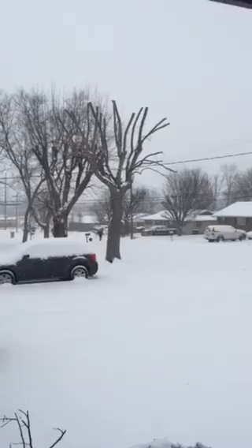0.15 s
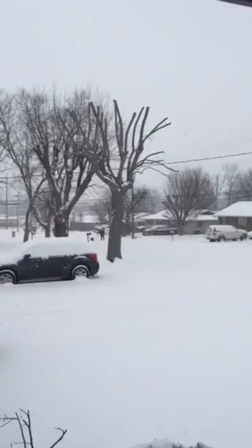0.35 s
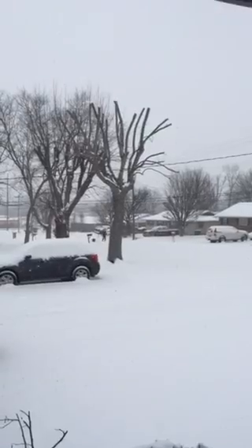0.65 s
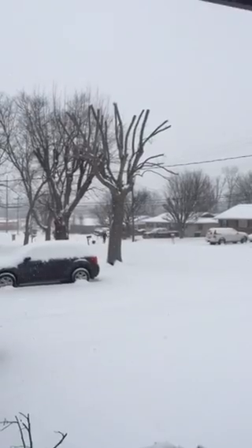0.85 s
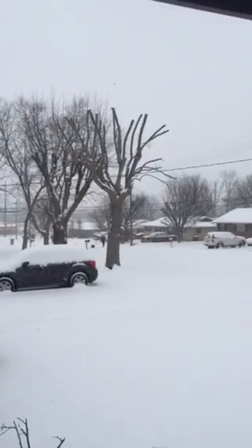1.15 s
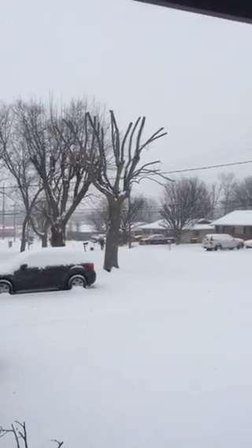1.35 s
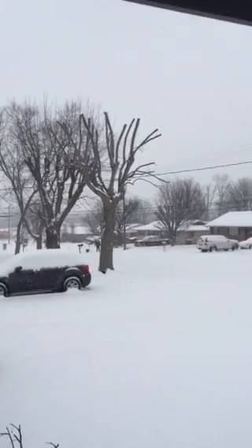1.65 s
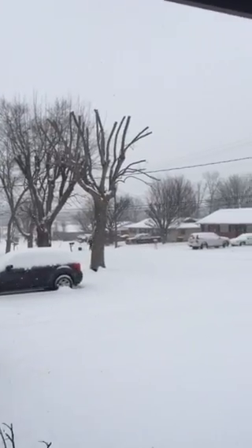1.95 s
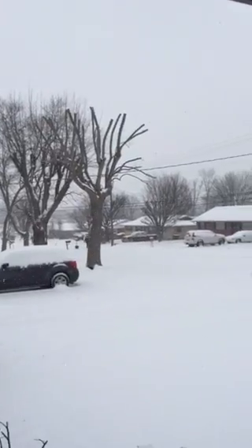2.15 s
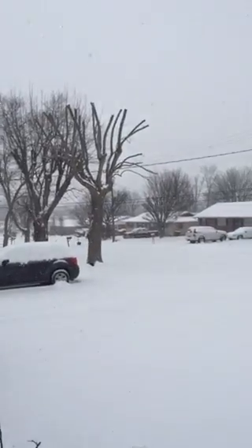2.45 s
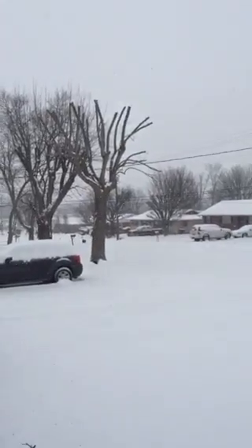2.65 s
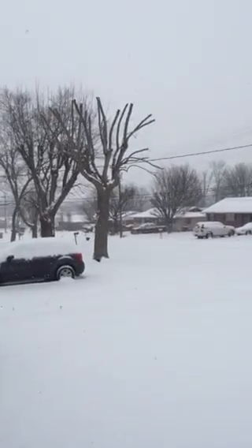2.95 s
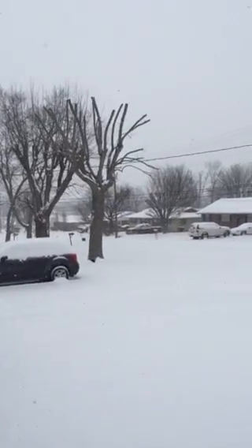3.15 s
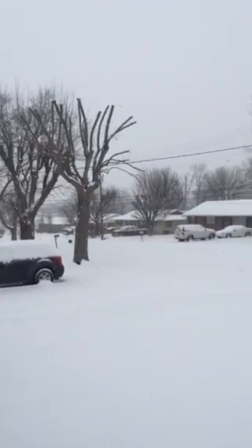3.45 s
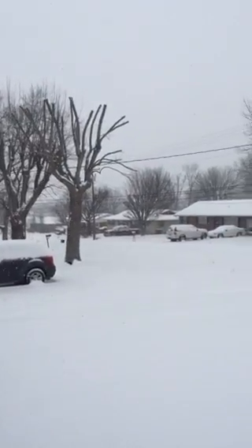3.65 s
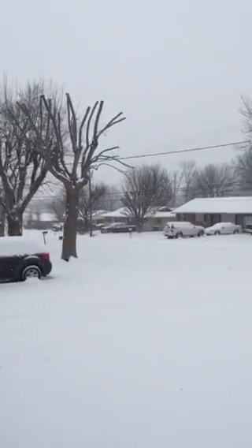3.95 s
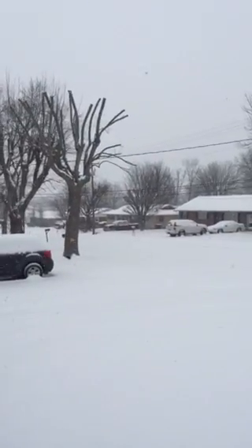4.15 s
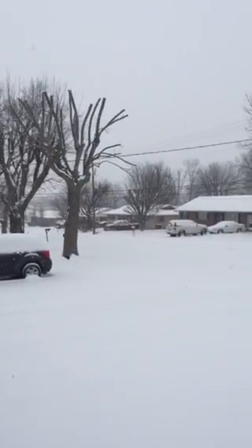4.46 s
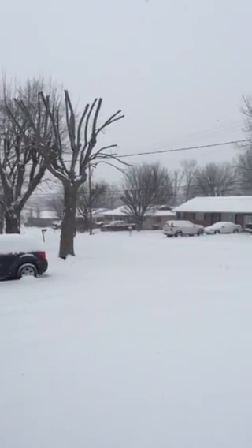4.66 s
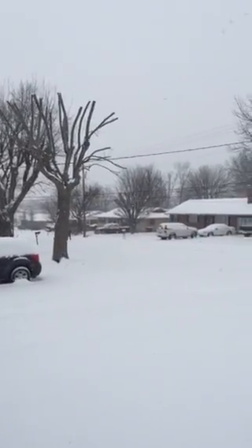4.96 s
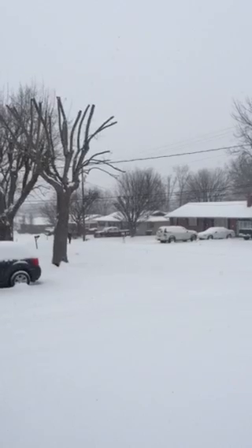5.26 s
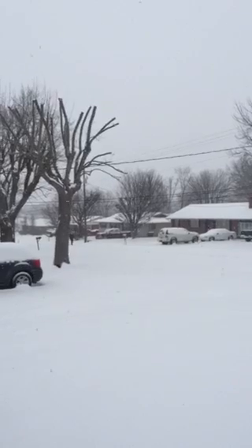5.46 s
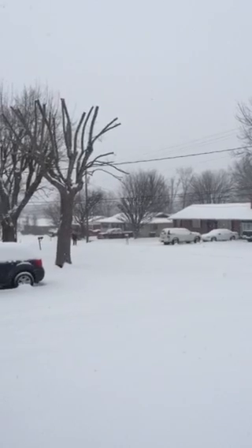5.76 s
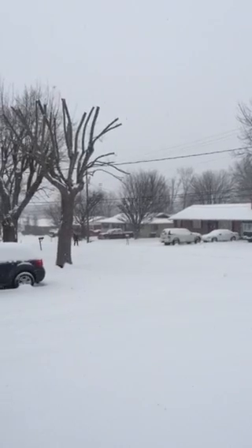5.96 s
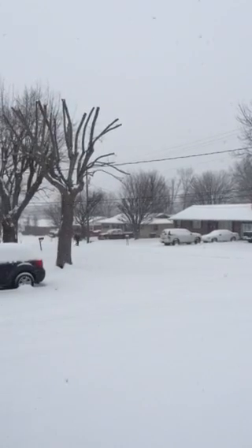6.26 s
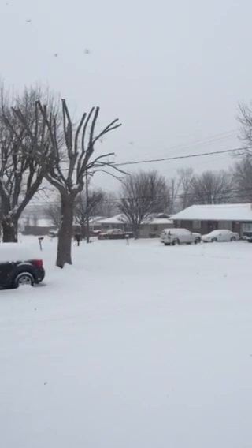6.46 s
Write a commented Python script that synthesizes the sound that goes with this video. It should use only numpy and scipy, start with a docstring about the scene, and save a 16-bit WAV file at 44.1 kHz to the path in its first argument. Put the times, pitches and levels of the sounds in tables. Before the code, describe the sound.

Close to the microphone on a snowy porch, a light outer door swings shut. Its spring gives single hollow knocks, quickening and softening, then the closer rubs with a dry hiss. The door bangs in a tight cluster of wood knocks and metallic latch clacks, with a low panel boom and fading rattle. A brief seal scrape, thin squeak and faint taps follow over a hushed street.

```python
"""A snowy porch: a light outer house door swings shut beside a phone.
Its spring knocks on the jamb faster and faster, its closer rubs; coloured noise and decaying modes make both.
The door strikes the frame, the latch clacks home, and the panel booms and rattles in struck modes and noise.
The seal gives one short scrape of slips and friction, then a thin squeak; soft hollow taps follow.
Behind lie a hushed street with a far engine droning, a muffled road, a hiss and a brief wavering hum."""
import sys
import numpy as np
from scipy import signal
from scipy.fft import rfft, irfft, next_fast_len
from scipy.io import wavfile
from scipy.ndimage import map_coordinates

SR = 44100
rng = np.random.default_rng(int(sys.argv[2]) if len(sys.argv) > 2 else 0)


def generate_wav(signal):
    """Clip the signal to [-1, 1] and save it as 16-bit WAV at the path in sys.argv[1]."""
    frames = np.transpose(np.atleast_2d(signal))
    scaled = np.clip(frames, -1, 1) * 32767
    pcm = np.round(scaled).astype(np.int16)
    wavfile.write(sys.argv[1], SR, pcm)


N = 291490

# Levels in spectra, modes and events are relative; each source sets its own gain.
# door, latch and frame meeting: (time [s], clack level [dB], wood knock level [dB], metal crack level [dB],
# t60 [s], treble limit [Hz])
BLOWS = [(3.927, -29, -20, -38, .07, 30000), (4.102, -33, -32.5, -30.5, 0.16, 11050),
         (4.179, -26.5, -36, -23.5, 0.054, 18000), (4.185, -21, -39.5, -26, 0.046, 9460),
         (4.212, -30.5, -39, -32, 0.15, 12490), (4.273, -33.5, -27.5, -31.5, .075, 9000),
         (4.331, -45.5, -49, -42, 0.108, 8630), (4.360, -48, -49, -49, .09, 9000),
         (4.469, -42.5, -45, -51, .11, 7500), (4.670, -58.5, -66, -71, 0.07, 6000)]
# clack spectrum: (frequency [Hz], level [dB])
CLACK_SPECTRUM = [(300, -19), (600, -13), (800, -9), (1100, -2.5), (1380, -1), (1600, -0.5), (2100, 3.5),
                  (2700, -4), (3400, -5.5), (5000, -18.5), (9000, -26.5)]
# wood knock spectrum: (frequency [Hz], level [dB])
KNOCK_SPECTRUM = [(70, -20), (140, 3), (225, -2.5), (340, -0.5), (430, -7), (530, -5), (610, -4),
                  (780, -10), (1000, -5.5), (2000, -26)]
# latch metal crack spectrum: (frequency [Hz], level [dB])
CRACK_SPECTRUM = [(430, -17), (560, 9), (660, 9.5), (780, -14), (1300, -14), (2500, 0), (3300, 0.5),
                  (4100, 2), (5000, -4.5), (5900, 2), (7500, -2.5), (10000, -7.5), (14000, -9.5),
                  (16000, -21.5)]
# hollow modes of the door frame: (frequency [Hz], level [dB], t60 [s])
WOOD_MODES = [(145, -6.5, 0.063), (228.6, -1, .1), (334.3, -8, 0.034), (540, -11.5, .06)]
# ringing of the door's pane and frame: (frequency [Hz], level [dB], t60 [s])
PANE_MODES = [(236.5, -6, .7), (307, -17, 0.93), (601, -7, 0.38), (669, -18.5, 0.52), (850, -16, 0.253),
              (1173, -8, 0.22), (1356, -1, 0.076), (1633, -6, 0.2), (1700, -4, 0.12), (1810, -11.5, 0.17),
              (1897, -11, .25), (2083, -6, .22), (2376, -15, 0.067), (3350, -15, .1), (4240, -26, 0.11),
              (5600, -17.5, 0.085)]
# whole panel flexing against its stop: (time [s], level [dB])
THUDS = [(3.925, -33), (4.187, -33), (4.213, -27), (4.263, -24), (4.294, -27.5)]
# lowest panel modes: (frequency [Hz], level [dB], t60 [s])
PANEL_MODES = [(53.6, -7, 0.53), (80.9, -2, 0.21), (103.3, -9.5, 0.3), (147, -7.5, 0.16)]
# air shoved by the panel: (frequency [Hz], level [dB])
BOOM_SPECTRUM = [(35, -21.5), (50, -1), (85, -2.5), (115, 1), (150, -1.5), (200, -7.5), (400, -22)]
# slips of the door spring: (time [s], knock level [dB], twang level [dB])
SPRING_SLIPS = [(0.234, -39.5, -66), (0.718, -40, -59), (1.141, -38.5, -49), (1.468, -39, -48),
                (1.766, -40.5, -51.5), (2.037, -47, -55), (2.298, -44.5, -63), (2.538, -47, -61),
                (2.731, -47.5, -59.5), (2.939, -48, -55.5), (3.147, -53.5, -57), (3.332, -51, -65.5)]
# jamb knock spectrum: (frequency [Hz], level [dB])
JAMB_SPECTRUM = [(90, -15), (140, 13), (205, -23), (290, 1), (380, -6.5), (470, -1), (630, 0), (740, -7.5),
                 (860, -1), (1000, -8.5), (1250, -12.5), (1620, -7.5), (2250, -31), (2750, -23),
                 (5000, -74)]
# jamb modes: (frequency [Hz], level [dB], t60 [s])
JAMB_MODES = [(125.3, 0, 0.45), (305.9, -26, 1), (452, -22, 0.2), (647.3, -0.5, 0.16), (810, -14, 0.08),
              (980, -10.5, 0.15), (1447, -3, 0.081), (1645, -5, 0.052)]
# spring coil spectrum: (frequency [Hz], level [dB])
COIL_SPECTRUM = [(330, -22), (480, -7), (580, 10), (700, 1.5), (850, -1.5), (1050, -3.5), (1400, -22.5),
                 (1800, -47)]
# bright snap of a spring slip: (frequency [Hz], level [dB])
SNAP_SPECTRUM = [(1000, 7.5), (1700, 3), (2300, 3.5), (2900, 3.5), (4200, -9.0), (6200, -7), (9000, -28)]
# slides of the closer's rod: (start [s], length [s], groan level [dB], hiss level [dB])
SLIDES = [(2.486, 0.18, -63.5, -70.5), (2.712, 0.024, -63, -69), (3.085, 0.04, -67, -74.5),
          (3.322, 0.031, -69, -67), (3.423, 0.053, -55, -64.5), (3.5, .04, -66.5, -83),
          (3.539, 0.079, -61, -64.5), (3.622, 0.061, -59.5, -59.5), (3.718, 0.074, -69.5, -74)]
# hollow rub of the rod: (frequency [Hz], level [dB])
ROD_SPECTRUM = [(700, -5), (900, -5.5), (1010, 0), (1150, -9), (1350, 2), (1520, -8), (1670, 1.5),
                (1860, -1.5), (2050, -3.5), (2450, -11), (3500, -18)]
# dry hiss of the rod: (frequency [Hz], level [dB])
ROD_HISS_SPECTRUM = [(1800, -8), (2900, 1), (4100, -2), (4900, -7), (5800, -5), (7500, -14.5), (10000, -24),
                     (14000, -34)]
# weatherstrip brushing the frame: (start [s], length [s], rub level [dB], wood level [dB])
BRUSHES = [(3.898, .027, -47, -51.5), (4.557, 0.051, -52, -69)]
# weatherstrip rub spectrum: (frequency [Hz], level [dB])
STRIP_SPECTRUM = [(300, -19.5), (650, -14.5), (950, 5), (1400, -4), (2100, 5.5), (3000, -1.5), (4200, -5),
                  (6000, -14), (9000, -20), (15000, -46)]
# seal scrape spectrum: (frequency [Hz], level [dB])
SEAL_SPECTRUM = [(600, -13), (780, -20), (840, 3.5), (1400, -3), (2100, -3.5), (2350, -5), (4100, -5.5),
                 (6500, -10.5), (9000, -23.5), (15000, -41.5)]
# frame resonances under the scrape: (frequency [Hz], width [Hz], level [dB])
SEAL_PEAKS = [(1066, 35, -8), (1376, 44, 2.5), (1647, 29, 6.5), (2020, 61, 2)]
# seal coming to rest: (frequency [Hz], level [dB])
CREEP_SPECTRUM = [(800, -6.5), (1600, -1), (2600, -1.5), (6500, -4), (9000, -15), (15000, -31.5)]
# soft faint taps: (time [s], frequency [Hz], level [dB])
TAPS = [(5.03, 190, -64), (5.29, 460, -60), (5.345, 504, -59), (5.42, 525, -60.5), (5.48, 508, -60)]
# noise of a tap: (frequency [Hz], level [dB])
SCUFF_SPECTRUM = [(400, -2), (900, -7), (1400, -9.5), (2200, -21)]
# far engine: (frequency [Hz], level [dB])
EXHAUST_SPECTRUM = [(25, -34), (45, -22.5), (62, -4.5), (71, -3.5), (80, -5.5), (95, -21), (112, -11.5),
                    (135, -22.5), (220, -29)]
# far road: (frequency [Hz], level [dB])
ROAD_SPECTRUM = [(30, -2), (110, 3.5), (200, -4.5), (330, -5), (450, -8.5), (700, -13.5), (1200, -17),
                 (3000, -29)]
# steady hiss: (frequency [Hz], level [dB])
HISS_SPECTRUM = [(290, -33), (500, -12), (639, -2), (687, -0.5), (718, -21.5), (1260, -17.5), (1390, -13),
                 (1810, -14), (2000, -9.5), (2210, -11), (2710, -12), (4430, -14), (4900, -14.5),
                 (11800, -20.5), (15800, -21.5)]
# decay of the porch's answer: (frequency [Hz], t60 [s])
PORCH_DECAY = [(100, 0.99), (500, 0.4), (2000, 0.4), (6000, 0.29), (14000, 0.19)]

START_S, TOP_HZ = 0.066, 16000
# first rebound, each flight over the last, loss a rebound, extra loss of the wood knock
BOUNCE_S, BOUNCE_SHRINK, BOUNCE_LOSS_DB, WOOD_LOSS_DB = 0.024, 0.6, 10.5, 4
RISE_S = 0.0014  # time constant of a contact's build-up
SHUDDER_START_S, SHUDDER_GAP_S = 4.362, 0.059
# first swing, its dying away, loose parts against the swing
SHUDDER_DB, SHUDDER_DB_PER_S, RATTLE_DB = -34, 43.5, -20
SNAP_DB = -63.5  # alike at every slip
SLIDE_ATTACK_S, SLIDE_T60_S = 0.012, 0.27
SCRAPE_S, SCRAPE_LENGTH_S, SCRAPE_DB = 4.745, 0.052, -37.5
SCRAPE_ATTACK_S, SCRAPE_T60_S = 0.0098, 0.13
SQUEAK_S, SQUEAK_LENGTH_S, SQUEAK_DB = 4.905, 0.067, -64.5
ENGINE_FAR_DB, ENGINE_NEAR_DB, APPROACH_S = -69, -52.5, 2.85  # draws nearer, then stays
ROAD_DB, ROAD_DB_PER_S = -66, -0.72
WHINE_DB, WHINE_LENGTH_S = -68, 1.68


def amp(db):
    """Decibels to gain."""
    return 10 ** (np.asarray(db) / 20)


def unit(x):
    """Scale to rms 1."""
    return x / np.sqrt(np.mean(x ** 2) + 1e-20)


def along(points, hz):
    """(Hz, value) points read on a log axis."""
    f, v = np.transpose(points)
    return np.interp(np.log(hz + 1), np.log(f + 1), v)


def wobble(knots_per_s, size=N):
    """A smooth random curve through normal knots."""
    knots = rng.standard_normal(int(size * knots_per_s / SR) + 4)
    return map_coordinates(knots, [np.arange(size) * knots_per_s / SR])


def filtered(x, response):
    """x times a response of frequency."""
    m = next_fast_len(len(x) + 8192)
    return irfft(rfft(x, m) * response(np.fft.rfftfreq(m, 1 / SR)), m)[:len(x)]


def shape(spectrum, hz):
    """Gain of a spectrum that falls away beyond its ends."""
    low_skirt = np.minimum(1, hz / spectrum[0][0]) ** 2
    high_skirt = np.minimum(1, spectrum[-1][0] / (hz + 1)) ** 2
    return amp(along(spectrum, hz)) * low_skirt * high_skirt


def noise(spectrum, size):
    """Coloured noise of rms 1."""
    return unit(filtered(rng.standard_normal(size), lambda hz: shape(spectrum, hz)))


def dappled(x, depth_db, spacing_hz):
    """Many close resonances: a random comb of peaks and notches."""
    knots = rng.standard_normal(SR // 40)

    def comb(hz):
        return unit(amp(depth_db * map_coordinates(knots, [hz / spacing_hz], mode="mirror")))
    return filtered(x, comb)


def fade(t60_s, attack_s):
    """One second of a struck envelope."""
    t = np.arange(SR) / SR
    return np.exp(-np.log(1000) * t / t60_s) * (1 - np.exp(-t / attack_s))


def stroke(start_s, length_s, attack_s, t60_s):
    """Envelope of a sliding contact: it swells, holds for its length and dies away."""
    t = np.maximum(np.arange(N) / SR - start_s, 0)
    release = np.exp(-np.log(1000) * np.maximum(t - length_s, 0) / t60_s)
    return (1 - np.exp(-t / attack_s)) * release


def ring(modes, attack_s, scatter_db):
    """Decaying modes, struck with new strengths at each blow."""
    t = np.arange(SR, dtype=np.float32) / SR
    tones = 0
    for k, (hz, db, t60_s) in enumerate(modes):
        strength = float((-1) ** k * amp(db + scatter_db * rng.standard_normal()))
        # decay is held past two t60, already inaudible
        decay = np.exp(float(-np.log(1000) / t60_s) * np.minimum(t, float(2 * t60_s)))
        tones = tones + strength * np.sin(float(2 * np.pi * hz) * t) * decay
    return tones * (1 - np.exp(-t / attack_s))


def add(track, s, sound):
    """Mix a sound in at time s."""
    start = round(s * SR)
    track[start:start + len(sound)] += sound[:N - start]


def porch(x, wet_db):
    """The sound with the answer of the walls and roof; treble dies first."""
    hz, t, z = signal.stft(rng.standard_normal(SR), SR, nperseg=256)
    decay = np.exp(-np.log(1000) * t / along(PORCH_DECAY, hz)[:, None])
    tail = signal.istft(z * decay, SR, nperseg=256)[1][:SR]
    tail = tail * (1 - np.exp(-np.arange(SR) / SR / 0.0023))
    return x + amp(wet_db) * signal.fftconvolve(x, tail / np.linalg.norm(tail))[:len(x)]


def door(contacts=3):
    """Each blow is followed by quicker, weaker rebounds."""
    out = np.zeros(N)
    for s, clack_db, knock_db, crack_db, t60_s, hard_hz in BLOWS:
        for k in range(contacts):
            hit = contact(clack_db, knock_db - k * WOOD_LOSS_DB, crack_db, t60_s, hard_hz)
            add(out, s, amp(-k * BOUNCE_LOSS_DB) * hit)
            s = s + BOUNCE_S * BOUNCE_SHRINK ** k
    return porch(out, wet_db=-11.0)


def contact(clack_db, knock_db, crack_db, t60_s, hard_hz,
            ring_db=-11, chatter_db=2.0, spike_db=2, tick_db=-18):
    """One contact clacks, knocks the wood, cracks the latch metal and rings the pane."""
    # loose parts chatter while the blow dies away
    blow = fade(t60_s, RISE_S) * amp(chatter_db * wobble(380, size=SR))
    # each point of contact wakes its own set of resonances
    clack = dappled(noise(CLACK_SPECTRUM, SR), depth_db=1.5, spacing_hz=77.8) * blow
    clack = clack + amp(ring_db) * ring(PANE_MODES, RISE_S, scatter_db=3)
    spikes = unit(amp(spike_db * wobble(1100, size=SR)))
    crack = dappled(noise(CRACK_SPECTRUM, SR), depth_db=3.5, spacing_hz=174.0) * blow * spikes
    knock = amp(-4) * noise(KNOCK_SPECTRUM, SR) * fade(0.1, RISE_S)
    knock = knock + amp(-1.5) * ring(WOOD_MODES, RISE_S, scatter_db=1)
    # a knock on the wood starts with a bright tick
    knock = knock + amp(tick_db) * rng.standard_normal(SR) * fade(0.054, RISE_S)
    hit = amp(clack_db) * clack + amp(knock_db) * knock + amp(crack_db) * crack
    # a soft contact loses its treble
    return filtered(hit, lambda hz: 1 / np.sqrt(1 + (hz / hard_hz) ** 4))


def thuds():
    """The panel booms each time it is driven against the stop."""
    out = np.zeros(N)
    for s, db in THUDS:
        add(out, s, amp(db) * flex())
    return out


def flex(boom_db=-10):
    """One boom of the panel in its lowest modes, with the air that it shoves."""
    shoved_air = noise(BOOM_SPECTRUM, SR) * fade(0.55, 0.0037)
    return ring(PANEL_MODES, 0.0026, scatter_db=1.0) + amp(boom_db) * shoved_air


def shudder(count=8, scatter_s=0.0046, wood_db=4, metal_db=-7):
    """The shut door swings against its latch ever more weakly; every swing rattles the loose parts."""
    out = np.zeros(N)
    for k in range(count):
        age_s = k * SHUDDER_GAP_S + scatter_s * rng.standard_normal()
        rattle = contact(RATTLE_DB, RATTLE_DB + wood_db, RATTLE_DB + metal_db, t60_s=0.33, hard_hz=6500)
        swing_gain = amp(SHUDDER_DB - SHUDDER_DB_PER_S * age_s)
        add(out, SHUDDER_START_S + age_s, swing_gain * (flex() + rattle))
    return out


def spring(body_db=-7, modes_db=-10, twang_db=0, delay_1k_s=0.021):
    """Each slip of the spring snaps and knocks on the jamb, then returns along the coil as a falling twang."""
    out = np.zeros(N)

    def disperse(hz):
        # bending waves are dispersive: down to 200 Hz the delay grows as the frequency falls
        return np.exp(-2j * np.pi * delay_1k_s * 1000 * np.log(np.maximum(hz, 200)))
    for s, knock_db, coil_db in SPRING_SLIPS:
        body = amp(body_db) * noise(JAMB_SPECTRUM, SR) * fade(0.21, 0.00055)
        body = body + amp(modes_db) * ring(JAMB_MODES, 0.0032, scatter_db=3.5)
        snap = amp(SNAP_DB) * noise(SNAP_SPECTRUM, SR) * fade(0.17, 0.00074)
        coil = noise(COIL_SPECTRUM, SR) * fade(0.14, 0.00023)
        twang = amp(coil_db + twang_db) * filtered(coil, disperse)
        add(out, s, porch(amp(knock_db) * body + snap + twang, wet_db=-18.0))
    return out


def closer(groan_db=-2, rod_hiss_db=-2, grain_db=2.5, fleck_db=3.0):
    """The rod of the door closer slides with a hollow rub and a dry, uneven hiss."""
    groan_gain = hiss_gain = 0
    for s, length_s, low_db, high_db in SLIDES:
        slide = stroke(s, length_s, SLIDE_ATTACK_S, SLIDE_T60_S)
        groan_gain = groan_gain + amp(low_db + groan_db) * slide
        hiss_gain = hiss_gain + amp(high_db + rod_hiss_db) * slide
    groan = dappled(noise(ROD_SPECTRUM, N), depth_db=3.0, spacing_hz=56.8)
    groan = groan * unit(amp(grain_db * wobble(90)))
    hiss = dappled(noise(ROD_HISS_SPECTRUM, N), depth_db=2.0, spacing_hz=147.0)
    hiss = hiss * unit(amp(fleck_db * wobble(140)))
    return porch(groan_gain * groan + hiss_gain * hiss, wet_db=-11)


def seal(slips_per_s=105, slips_db=-3, peaks_db=11, linger_db=-31.5, linger_t60_s=2.2):
    """The seal drags over the sill in uneven slips that excite frame resonances, then creeps faintly to rest."""
    slip_phase = np.cumsum(slips_per_s * amp(1.7 * wobble(60))) / SR
    slips = np.diff(np.floor(slip_phase), prepend=0)  # one impulse a slip
    soft_slips = filtered(unit(slips), lambda hz: 1 / (1 + 1j * hz / 2500))
    friction = dappled(rng.standard_normal(N), depth_db=3.3, spacing_hz=71.6) + amp(slips_db) * soft_slips

    def peaks(hz):
        return sum(amp(db + peaks_db) * 1j * hz * width / (centre ** 2 - hz ** 2 + 1j * hz * width)
                   for centre, width, db in SEAL_PEAKS)
    scrape = unit(filtered(friction, lambda hz: shape(SEAL_SPECTRUM, hz) * (1 + peaks(hz))))
    drag = scrape * stroke(SCRAPE_S, SCRAPE_LENGTH_S, SCRAPE_ATTACK_S, SCRAPE_T60_S)
    creep_swell = stroke(SCRAPE_S, SCRAPE_LENGTH_S, SCRAPE_ATTACK_S, linger_t60_s)
    creep = amp(linger_db) * noise(CREEP_SPECTRUM, N) * creep_swell
    return amp(SCRAPE_DB) * porch(drag + creep, wet_db=-22)


def weatherstrip(grain_db=2):
    """The strip brushes the frame with a dry rub and stirs the wood."""
    out = np.zeros(N)
    rub = dappled(noise(STRIP_SPECTRUM, N), depth_db=2, spacing_hz=111)
    wood = noise(KNOCK_SPECTRUM, N)
    for s, length_s, rub_db, wood_db in BRUSHES:
        brush = stroke(s, length_s, attack_s=0.005, t60_s=0.13)
        out += brush * (amp(rub_db) * rub + amp(wood_db) * wood)
    return porch(out * amp(grain_db * wobble(150)), wet_db=-14)


def squeak(squeak_hz=1650):
    """The seal settles with a thin unsteady tone."""
    swell = amp(SQUEAK_DB) * stroke(SQUEAK_S, SQUEAK_LENGTH_S, attack_s=0.017, t60_s=0.084)
    return swell * np.sin(2 * np.pi * np.cumsum(squeak_hz + 35 * wobble(150)) / SR)


def taps(scuff_db=-7):
    """A few soft, hollow taps after the door has come to rest: one decaying mode and a scuff each."""
    out = np.zeros(N)
    for s, hz, db in TAPS:
        scuff = amp(db + scuff_db) * noise(SCUFF_SPECTRUM, SR) * fade(0.17, 0.0075)
        tap = ring([(hz, db, 0.1)], 0.005, scatter_db=0.5)
        add(out, s, porch(tap + scuff, wet_db=-7))
    return out


def street(hiss_db=-76, whine_hz=312, surge_db=2.5):
    """A far engine throbs over a slowly ebbing road and a steady hiss; a faint hum wavers at the start."""
    t = np.arange(N) / SR
    engine_db = np.interp(t, [0, APPROACH_S], [ENGINE_FAR_DB, ENGINE_NEAR_DB]) + surge_db * wobble(11)
    engine = amp(engine_db) * noise(EXHAUST_SPECTRUM, N)
    road = amp(ROAD_DB + ROAD_DB_PER_S * t + 1.2 * wobble(5.7)) * noise(ROAD_SPECTRUM, N)
    swell = stroke(0, WHINE_LENGTH_S, attack_s=0.45, t60_s=1.8) * amp(WHINE_DB + 4.5 * wobble(8.65))
    whine = swell * np.sin(2 * np.pi * np.cumsum(whine_hz + 6 * wobble(29.9)) / SR)
    return engine + road + whine + amp(hiss_db) * noise(HISS_SPECTRUM, N)


def scene():
    """All sources at one microphone."""
    closing_door = door() + thuds() + shudder() + spring() + closer()
    rubbing_seals = seal() + weatherstrip() + squeak()
    return (closing_door + rubbing_seals + taps() + street())[None]


def record(dry):
    """The phone opens a moment late and keeps nothing above its band limit."""
    opened = np.arange(N) >= START_S * SR
    return filtered(dry[0] * opened, lambda hz: hz < TOP_HZ)[None]


dry = scene()
out = record(dry)
generate_wav(out)
```